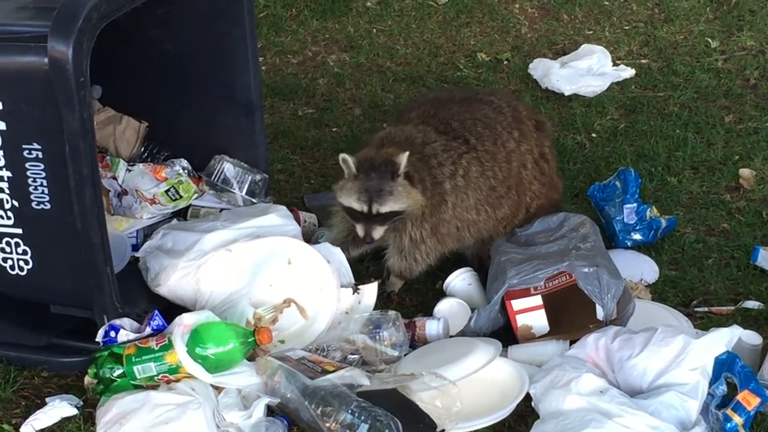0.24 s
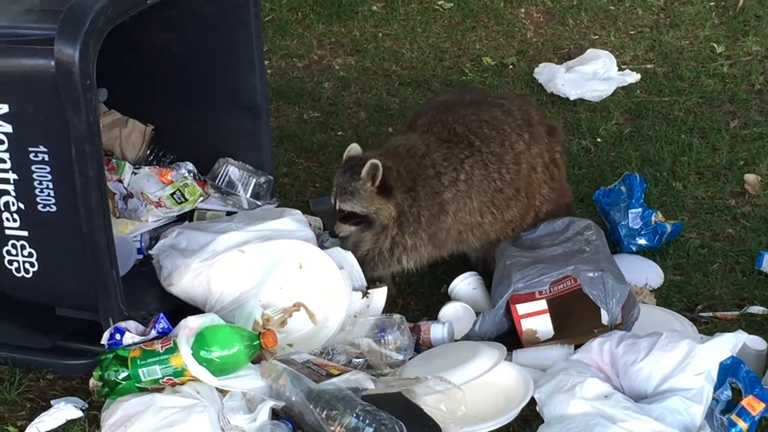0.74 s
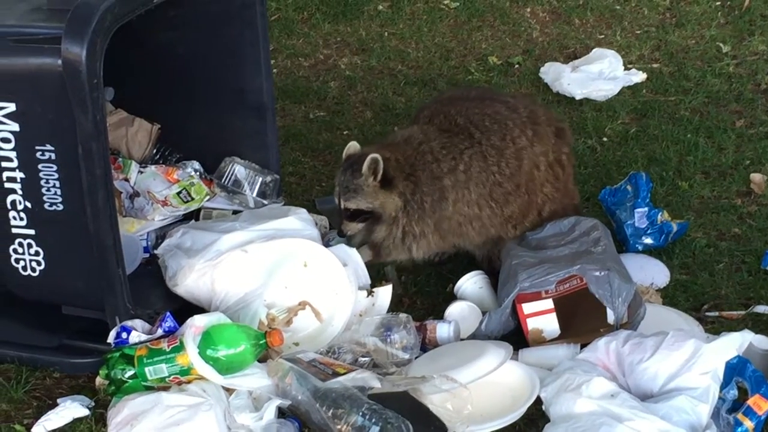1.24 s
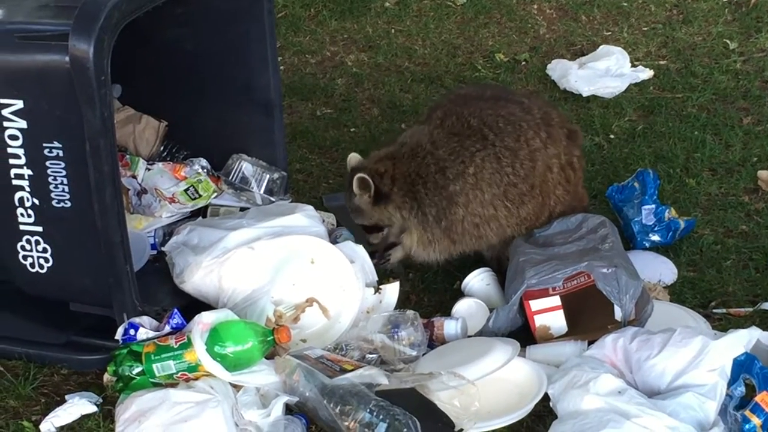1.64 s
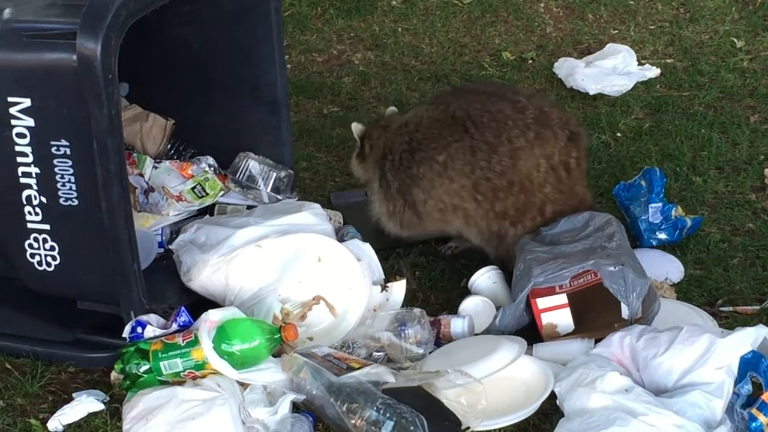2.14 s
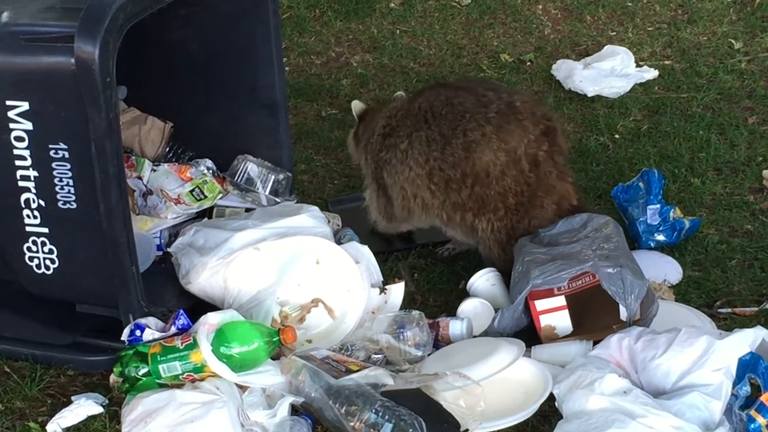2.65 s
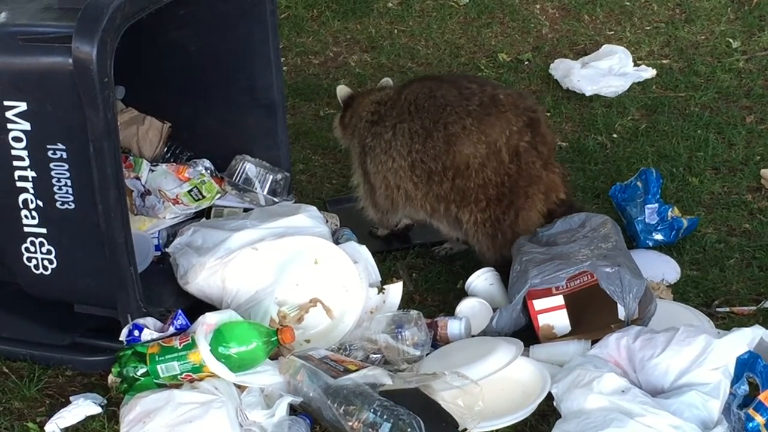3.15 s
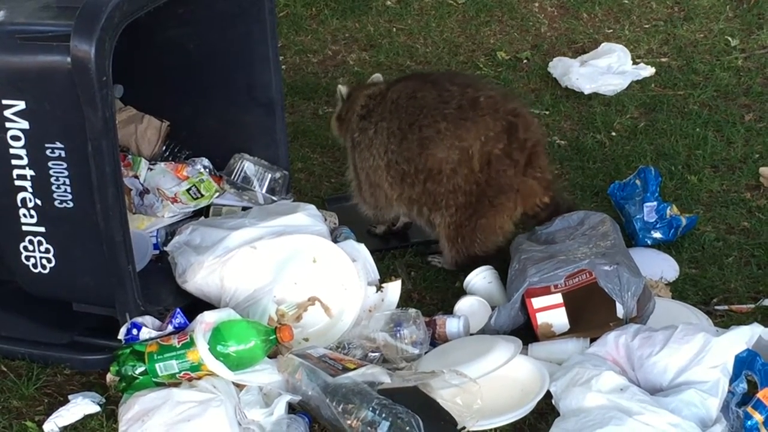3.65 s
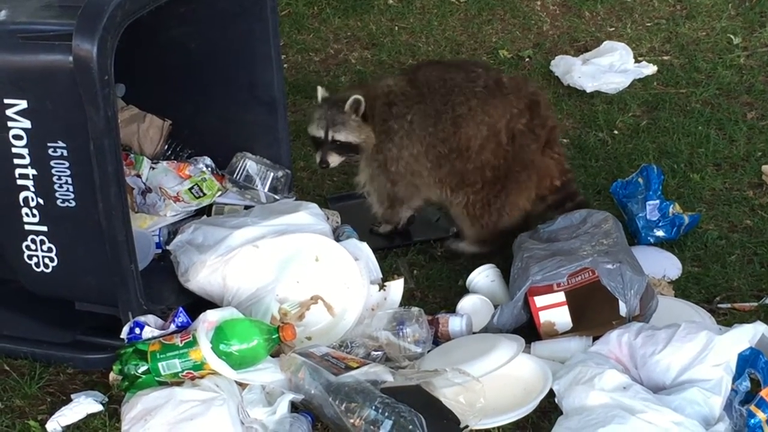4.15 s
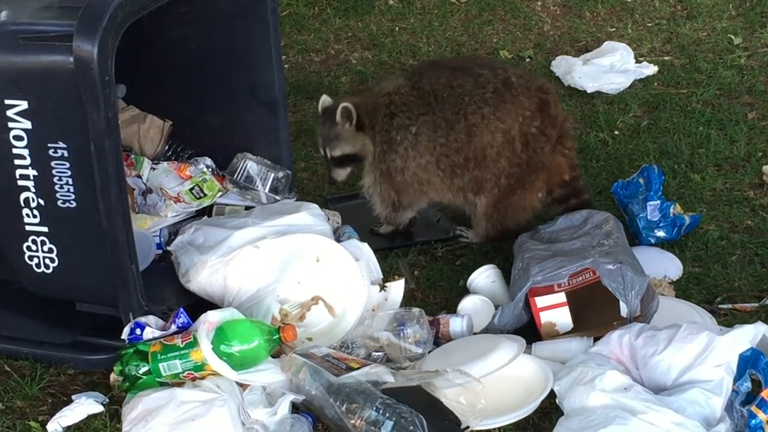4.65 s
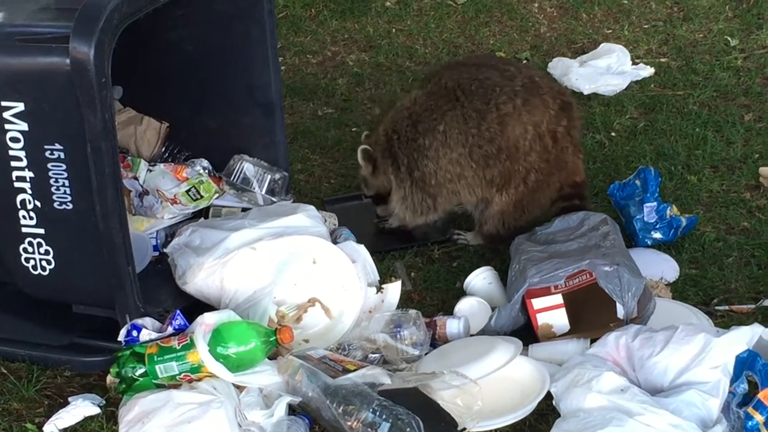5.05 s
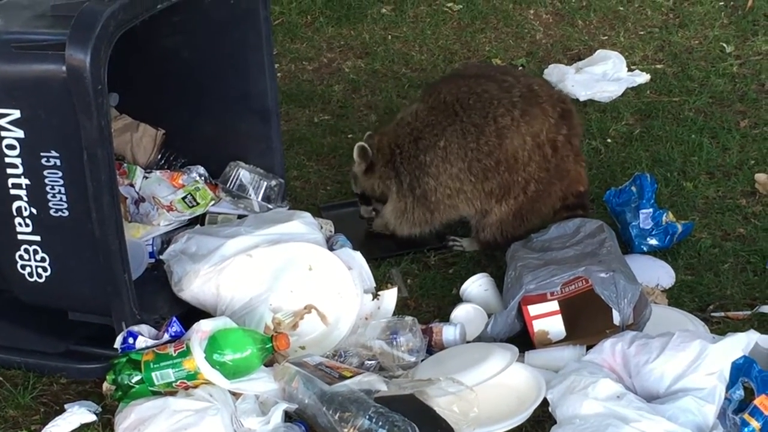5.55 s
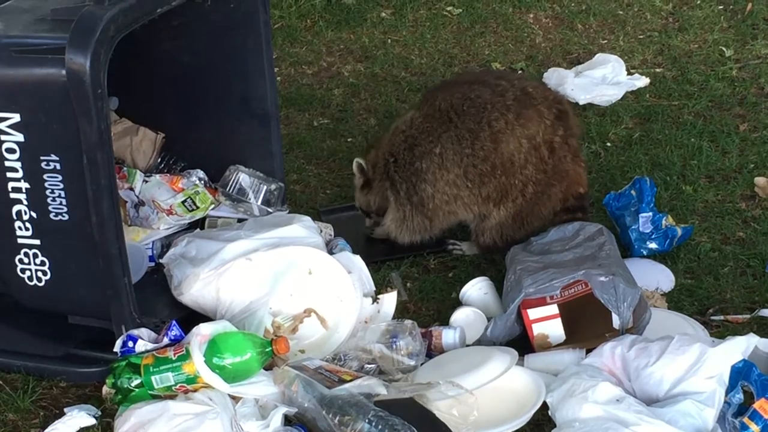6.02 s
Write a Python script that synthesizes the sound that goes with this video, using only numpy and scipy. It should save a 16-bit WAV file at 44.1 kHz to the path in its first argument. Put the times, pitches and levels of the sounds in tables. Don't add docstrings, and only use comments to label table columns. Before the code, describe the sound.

A quiet outdoor park bed runs throughout: low distant traffic rumble, a wavering machine hum near the bottom, and a thin soft hiss of leaves. Close by, a raccoon handles plastic rubbish. A small hollow tap sounds at 0.3 seconds, with faint rustles and a dull paw thud up to 0.7. Another light tap with a scrape comes at 1.2, beside a tiny bird chirp. At 2.2 to 2.35 comes the loudest event, a rapid dry clatter of hollow plastic with claws scraping a lid. A faint distant warble appears at 3.6, then a crisp film crinkle at 3.9. From 4.25 to 4.85 a near bird gives fast, high falling chirps, fading. A soft thud lands at 5.0, and the distant bird warbles again from 4.9 to 5.6, with light tree echo. Slight taps and rustle end around 6.2 as the rumble eases.

```python
import sys
import numpy as np
from scipy import signal
from scipy.fft import rfft, irfft, next_fast_len
from scipy.io import wavfile
from scipy.ndimage import uniform_filter1d

SR = 44100
rng = np.random.default_rng(int(sys.argv[2]) if len(sys.argv) > 2 else 0)


def waveform_to_disk(signal):
    frames = np.transpose(np.atleast_2d(signal))
    scaled = np.clip(frames, -1, 1) * 32767
    samples = np.round(scaled).astype(np.int16)
    wavfile.write(sys.argv[1], SR, samples)


def gain_from_db(level_db):
    decades = np.asarray(level_db, float) / 20
    return 10 ** decades


N = 276903
TIME = np.arange(N) / SR


def unit(x):
    return x / np.sqrt(np.mean(x ** 2))


def decay(t, t60):
    return np.exp(-np.log(1000) * t / t60)


def curve(table):
    s, level = np.transpose(table)
    return np.interp(TIME, s, level)


def colour(x, points, tilt_db=0):
    size = next_fast_len(len(x))
    octave = np.log2(np.maximum(np.arange(size // 2 + 1) * SR / size, 1))
    hz, db = np.transpose(points)
    gain_db = np.interp(octave, np.log2(hz), db) + tilt_db * (octave - 12)
    return irfft(rfft(x, size) * gain_from_db(gain_db), size)[:len(x)]


def walk(rate):
    k = int(SR / rate)
    steps = np.repeat(rng.standard_normal(N // k + 1), k)
    return 1.277 * uniform_filter1d(uniform_filter1d(steps, k), k)[:N]


def add(out, start_s, piece):
    i = int(start_s * SR)
    out[i:i + len(piece)] += piece[:N - i]


def patchy(points, bands, swell_db, flicker_db):
    size = next_fast_len(N)
    spectrum = rfft(colour(rng.standard_normal(size), points))
    half_octave = 2 * np.log2(np.maximum(np.arange(len(spectrum)) * SR / size, 16) / 16)
    out = np.zeros(N)
    for k in bands:
        window = np.cos(np.pi / 2 * np.clip(half_octave - k, -1, 1)) ** 2
        band = irfft(spectrum * window, size)[:N]
        depth = np.interp(k, [5, 9, 16], [.6, 1.2, .4])
        out += band * gain_from_db((swell_db * walk(2.58) + flicker_db * walk(9)) * depth)
    return unit(out)


def town():
    # f/Hz, density/dB
    rumble_tone = [(12, -63), (20, -43.5), (52, -2), (114, 1), (128, -2), (161, -6.5), (238, -13),
                   (382, -30.5), (500, -33), (650, -78), (1100, -120)]
    # f/Hz, density/dB
    hiss_tone = [(210, -26), (350, -7), (460, -11), (531, -2), (604, -0.5), (820, -3.5), (1170, -7.5),
                 (1310, -9), (1920, -13), (2690, -14.5), (4870, -20), (5810, -22), (7510, -22),
                 (14500, -27.5), (16200, -31.5)]
    # t/s, level/dB
    traffic_level = [(0.0, -47.5), (2.8, -49), (3.2, -49), (4.1, -47), (4.6, -50), (5.0, -48.5),
                     (6.28, -51.5)]
    # t/s, level/dB
    car_level = [(0.0, -64.5), (0.55, -61), (0.94, -63), (1.21, -60), (1.45, -61.5), (3.2, -62.5),
                 (3.8, -60), (4.15, -63.5), (4.5, -60), (4.8, -62.5), (5.9, -62.5), (6.28, -60.5)]

    traffic_db = curve(traffic_level)
    traffic = patchy(rumble_tone + [(700, -90)], range(12), swell_db=.5, flicker_db=1.3)
    drone = colour(traffic, [(150, -56), (230, 1)])
    rumble = (traffic - drone) * gain_from_db(traffic_db + 1.57)
    cars = unit(drone) * gain_from_db(curve(car_level))

    hiss = patchy([(250, -50)] + hiss_tone, range(7, 22), swell_db=.5, flicker_db=2.2) * gain_from_db(-67.5)

    hum_db = traffic_db - 7.5 + 1.5 * walk(3.4)
    hum_hz = 118.5 + 1.102 * walk(4)
    hum = np.sqrt(2) * np.sin(2 * np.pi * np.cumsum(hum_hz) / SR) * gain_from_db(hum_db)
    return rumble + cars + hiss + hum


def strokes(table, points, grain_db):
    out = np.zeros(N)
    middle_s = 4096 / SR
    edge = 2.45
    for s, length, db, tilt_db in table:
        grain_level = np.minimum(rng.exponential(size=256), 2.5).repeat(32)
        grains = rng.standard_normal(8192) * gain_from_db(grain_db * grain_level)
        stroke = np.exp(-np.abs(3.65 * (TIME[:8192] - middle_s) / length) ** edge / 2)
        add(out, s - middle_s, gain_from_db(db) * unit(colour(grains, points, tilt_db)) * stroke)
    return out


def swishes():
    # middle t/s, length/s, level/dB, tilt/(dB per octave)
    rustles = [(.455, .02, -71, -4), (.54, .02, -72, -6), (0.688, 0.05, -68.5, -3.5), (1.13, .04, -79, -2),
               (1.242, .006, -71, -2), (1.945, 0.044, -70, -4.5), (2.27, .07, -70, -4),
               (2.452, .005, -72, 5), (2.475, 0.06, -75, -2), (2.529, .004, -62, 9), (3.885, 0.055, -72, 0),
               (3.926, .02, -60, -2), (3.94, 0.037, -52.5, -0.5), (3.96, 0.035, -54, -5.5),
               (4.25, 0.014, -69, -3), (.33, .2, -75, -4.5), (6.215, .04, -77, 0)]
    # f/Hz, density/dB
    film_tone = [(900, -22), (1600, -11), (2200, -8), (3200, -7), (4700, -6), (6600, -13), (8200, 0),
                 (9400, -6), (10400, -10), (11800, -3), (13400, -15), (14800, 0), (15700, -7)]
    # middle t/s, length/s, level/dB, tilt/(dB per octave)
    scrapes = [
        (1.23, .035, -66, -1.5),
        (2.228, 0.027, -63, -2.5),
        (2.262, 0.072, -54.5, -2),
        (2.284, 0.045, -61.5, 1.5),
        (2.34, 0.078, -70.5, -0.5),
        (.66, .15, -73.5, 2),
    ]
    # f/Hz, density/dB
    lid_tone = [(250, -6.5), (400, -8), (700, -2), (1400, -4.5), (2000, 0), (2700, -23), (4000, -10.5),
                (5200, -19), (15000, -29.5)]
    return strokes(rustles, film_tone, grain_db=2.2) + strokes(scrapes, lid_tone, grain_db=2.5)


def taps():
    # t/s, peak level/dB, pitch f/Hz, crack over the ring/dB, t60/s
    hits = [(0.2907, -50, 1270, -19, 0.01), (0.976, -58, 885, -25, .012), (1.2413, -49, 1120, -15.5, 0.012),
            (1.2423, -58, 1890, -26, 0.01), (1.3574, -59, 2060, -22, 0.0098),
            (1.3582, -59, 1640, -26, 0.01), (2.242, -33.5, 1530, -24, 0.0076),
            (2.2472, -39, 1145, -10.5, 0.016), (2.2519, -35, 1470, -29, 0.0075),
            (2.2594, -49, 900, -22, 0.0079), (2.263, -43, 1380, -28, 0.0053),
            (2.272, -43, 1180, -28, 0.0057), (2.278, -52.5, 1420, -7, 0.0067),
            (2.2796, -53, 1910, -11.5, 0.023), (2.317, -59, 1700, -20, .01), (2.333, -60, 1500, -22, .012),
            (2.345, -59, 1250, -26, .012), (2.5495, -60, 964, -16, 0.029), (3.907, -60.5, 880, -13, 0.02),
            (4.0155, -58, 915, -29, .012), (5.04, -67, 1700, -25, 0.024), (5.738, -64, 895, -21, 0.013),
            (6.228, -61, 950, -26, .012)]
    # ratio to pitch, level/dB
    shell = [(.62, -7), (1, 3), (1.35, -16)]
    # f/Hz, width/Hz, level/dB
    crack_bands = [(3620, 250, 0), (4330, 230, -3), (7000, 2600, -33), (13000, 5000, -17)]

    out, t = np.zeros(N), TIME[:2048]
    for s, db, hz, crack_db, t60 in hits:
        grit = rng.standard_normal(len(t))
        fade = decay(t, t60) * (1 - np.exp(-t / 0.00037))
        ring = sum(gain_from_db(g) * np.sin(2 * np.pi * hz * r * t) for r, g in shell) * fade
        crack = np.zeros(len(t))
        for f, width, g in crack_bands:
            crack += gain_from_db(g) * unit(signal.lfilter(*signal.iirpeak(f, f / width, SR), grit))
        add(out, s, gain_from_db(db + 3.5) * (ring + gain_from_db(crack_db) * crack * fade ** 0.63))
    return out


def thuds():
    # t/s, peak level/dB, f/Hz, t60/s
    paws = [
        (1.241, -54.5, 390, .03),
        (2.246, -45, 345, 0.067),
        (1.7, -56, 270, 0.03),
        (0.42, -58, 325, 0.11),
        (4.98, -55, 296, 0.18),
    ]
    out, t = np.zeros(N), TIME[:8192]
    for s, db, hz, t60 in paws:
        add(out, s, gain_from_db(db) * np.sin(2 * np.pi * hz * t) * decay(t, t60) * (1 - np.exp(-t / 0.001)))
    return out


def bird(notes, partials):
    out = np.zeros(N)
    for s, length, start_hz, end_hz, db in notes:
        t = np.arange(0, length, 1 / SR)
        glide = np.minimum(t / length / .8, 1)
        phase = 2 * np.pi * np.cumsum(start_hz + (end_hz - start_hz) * glide) / SR
        swell_db = np.interp(t / length, [0, .29, 1], [-2, 0, -4.5])
        edge = np.clip(np.minimum(t, length - t) / .004, 0, 1)
        whistle = sum(gain_from_db(g) * np.sin(k * phase) for k, g in partials)
        add(out, s, whistle * gain_from_db(db + swell_db + 5.5) * edge)
    return out * gain_from_db(2.5 * walk(250))


def near_bird():
    # start t/s, length/s, second partial start f/Hz, its end f/Hz, peak level/dB
    chirps = [
        (1.118, .014, 8400, 8300, -88),
        (1.287, 0.023, 9330, 8200, -70.5),
        (4.249, .04, 9000, 7520, -64),
        (4.349, 0.023, 8630, 7470, -74),
        (4.515, 0.033, 8300, 7320, -77.5),
        (4.603, .024, 8550, 7350, -84),
        (4.686, .02, 8430, 7300, -83),
        (4.766, .024, 8500, 7300, -79.5),
        (4.853, .017, 8500, 7400, -87),
    ]
    # multiple of the second partial, level/dB
    chirp_partials = [(.5, -2.5), (1, 5.5), (1.5, -22)]
    return bird(chirps, chirp_partials)


def far_bird():
    # start t/s, length/s, start f/Hz, end f/Hz, peak level/dB
    warble = [(3.612, 0.065, 2820, 3040, -78), (3.702, .034, 3820, 3390, -72.5),
              (4.51, 0.04, 3460, 3680, -78), (4.615, .016, 3760, 3600, -79),
              (4.942, 0.015, 4270, 4180, -76), (5.172, .038, 2820, 2820, -76),
              (5.245, .03, 2950, 3040, -77), (5.318, .06, 2850, 2600, -77), (5.399, 0.022, 3640, 3400, -73),
              (5.427, .024, 3055, 2860, -63), (5.448, .045, 3480, 3540, -79), (5.48, .024, 3100, 2800, -76),
              (5.55, .035, 2860, 2910, -83)]
    return bird(warble, [(1, -4)])


def trees(x):
    # f/Hz, level/dB
    echo_colour = [(3000, -0.5), (9000, -2), (15000, -13)]
    t = TIME[:SR // 2]
    tail = rng.standard_normal(len(t)) * decay(t, 0.51) * np.clip(t / 0.004, 0, 1)
    return colour(signal.fftconvolve(x, tail / np.sqrt(np.sum(tail ** 2)))[:N], echo_colour)


def scene():
    litter = swishes() + taps() + thuds()
    near, far = near_bird(), far_bird()
    echo = trees(gain_from_db(-4) * (near + 1.17 * far) + gain_from_db(-14) * litter)
    return (town() + litter + near + far + echo)[None]


def top_cut(x):
    return signal.sosfilt(signal.butter(12, 16380, fs=SR, output="sos"), x)


def record(dry):
    # f/Hz, level/dB
    mic = [(20, -12), (45, -0.5), (4500, -0.5), (4950, -3.5), (5500, 0.5), (7000, -1), (7600, -4),
           (8300, -2), (9800, -2), (10500, -5.5), (11300, -2.5)]
    # f/Hz, level/dB
    top_end = [(15720, 0), (15790, -40)]
    mix = colour(dry[0], mic + top_end)[None]
    return top_cut(mix)


dry = scene()
out = record(dry)
waveform_to_disk(out)
```